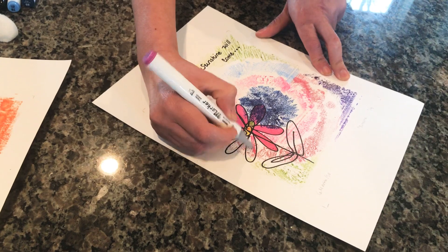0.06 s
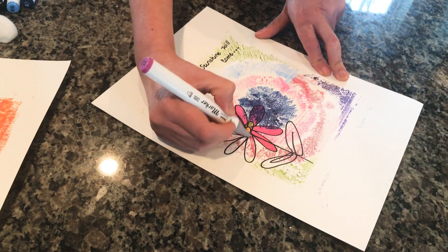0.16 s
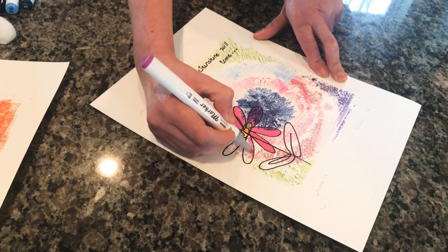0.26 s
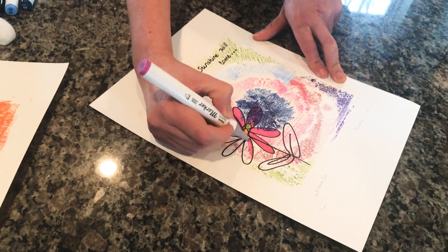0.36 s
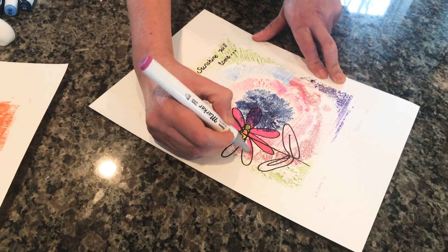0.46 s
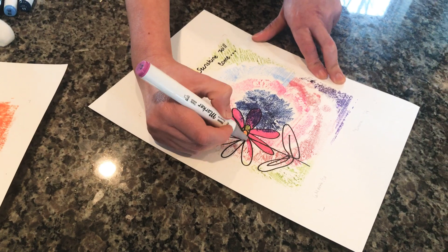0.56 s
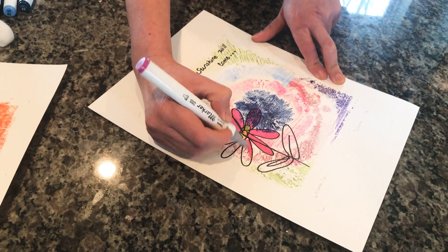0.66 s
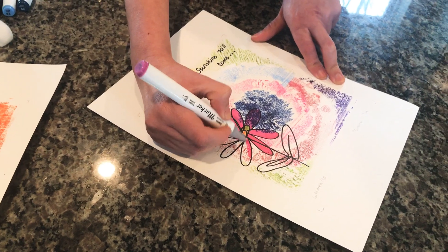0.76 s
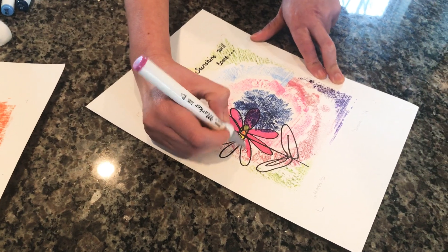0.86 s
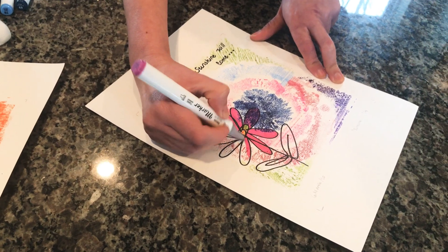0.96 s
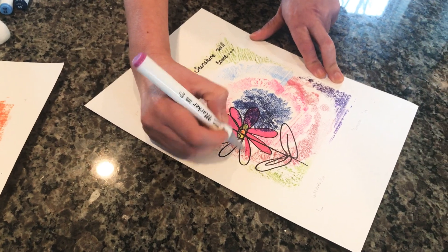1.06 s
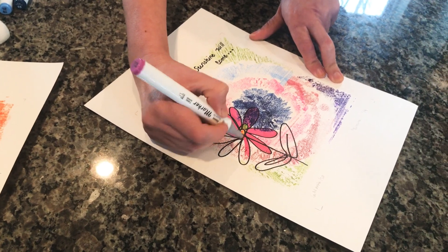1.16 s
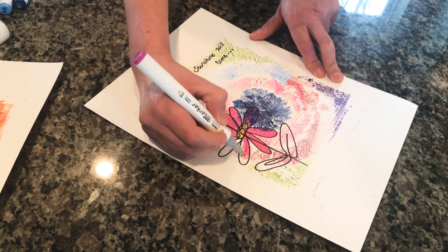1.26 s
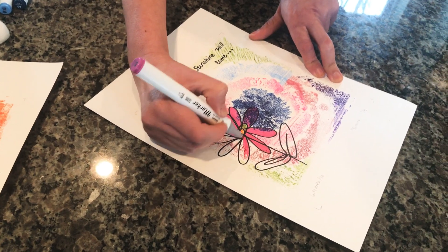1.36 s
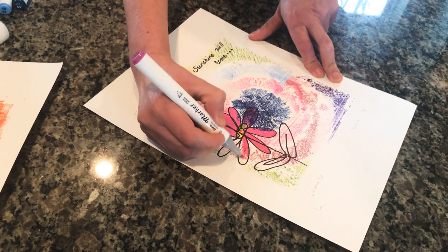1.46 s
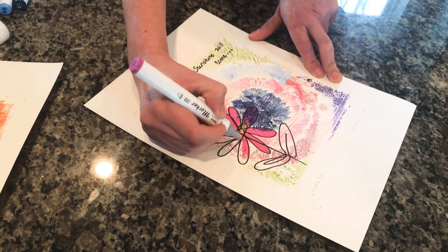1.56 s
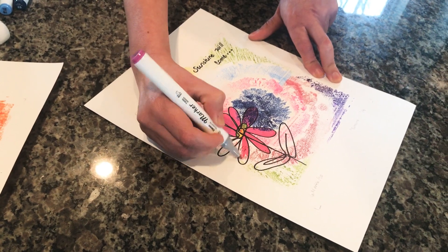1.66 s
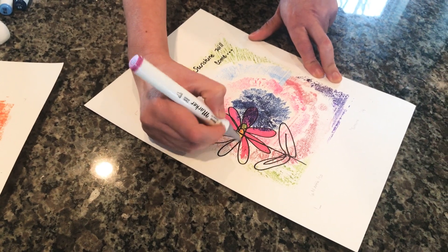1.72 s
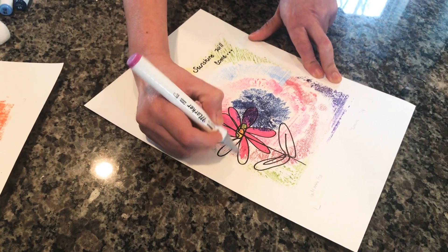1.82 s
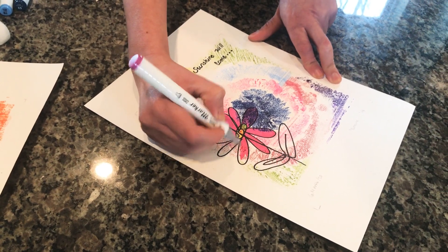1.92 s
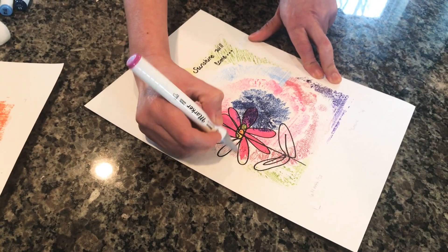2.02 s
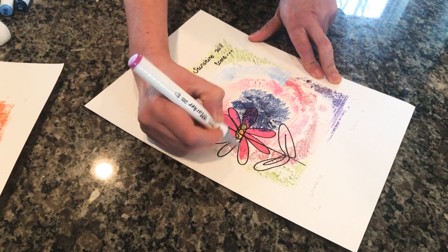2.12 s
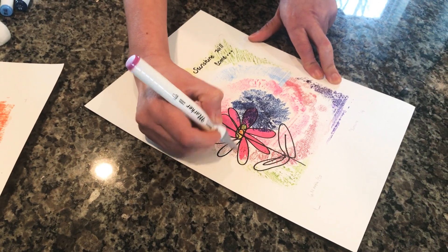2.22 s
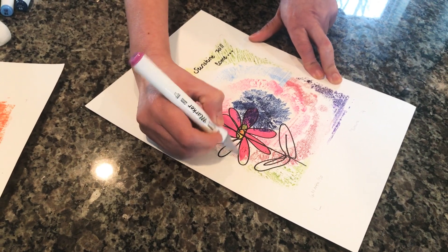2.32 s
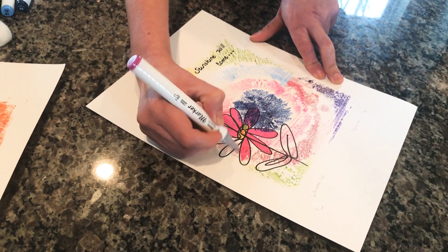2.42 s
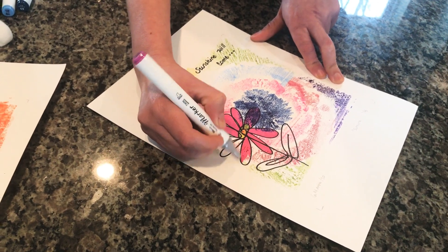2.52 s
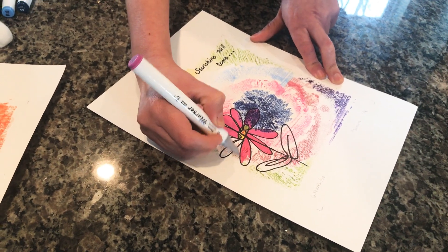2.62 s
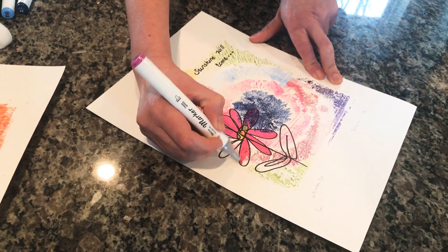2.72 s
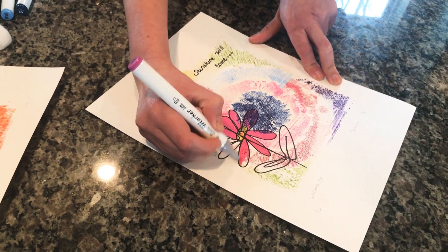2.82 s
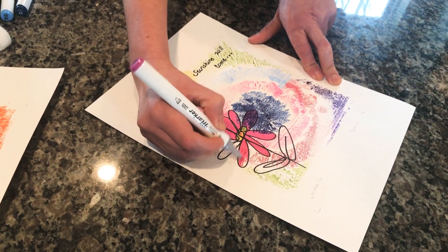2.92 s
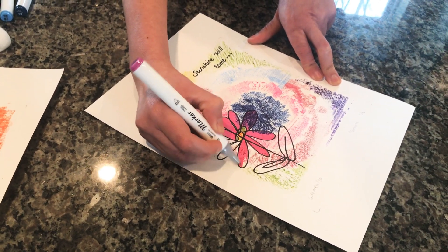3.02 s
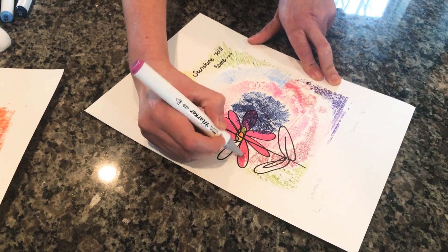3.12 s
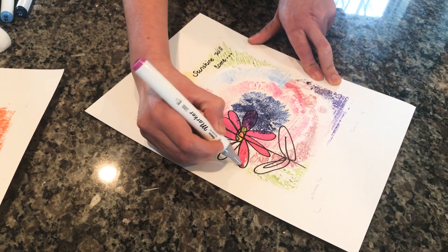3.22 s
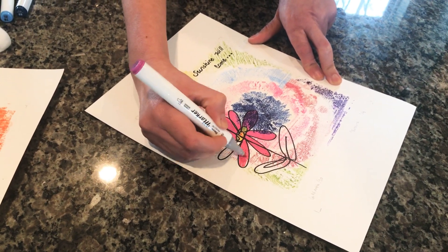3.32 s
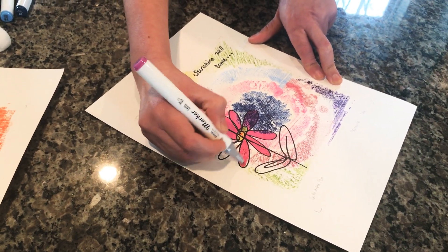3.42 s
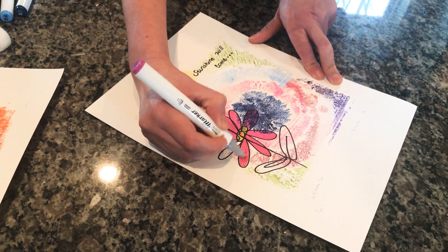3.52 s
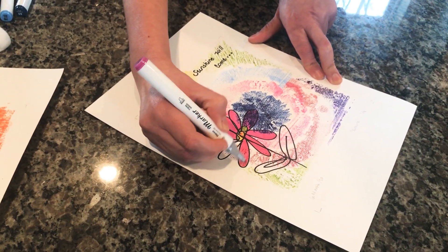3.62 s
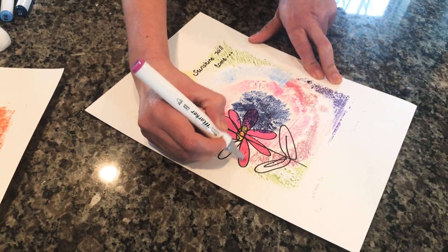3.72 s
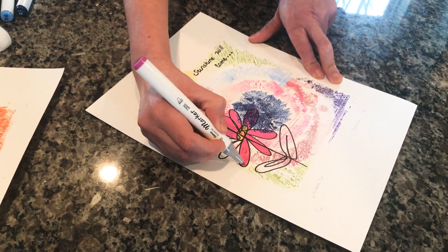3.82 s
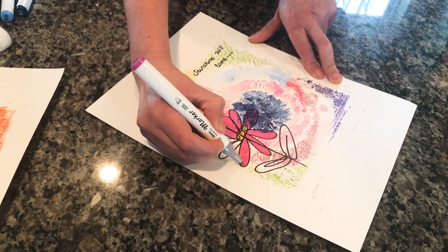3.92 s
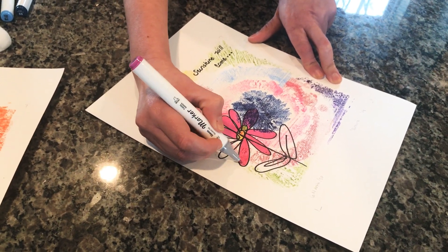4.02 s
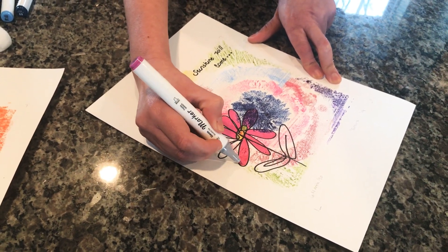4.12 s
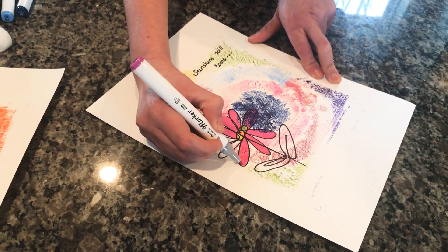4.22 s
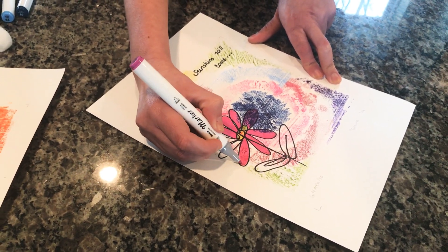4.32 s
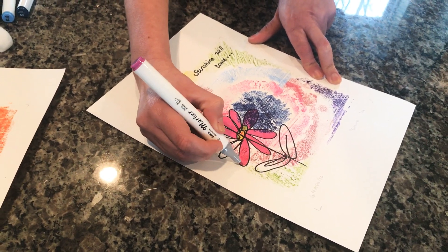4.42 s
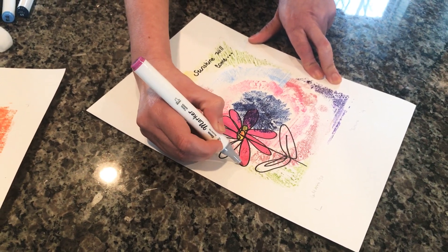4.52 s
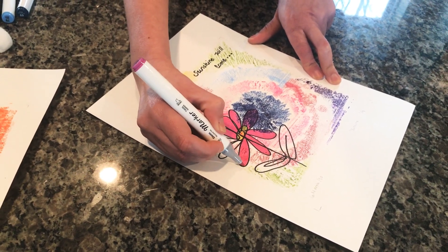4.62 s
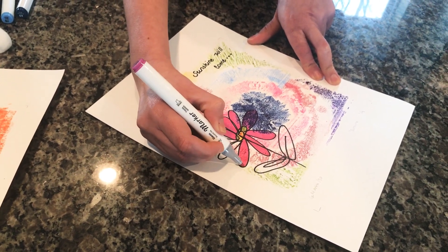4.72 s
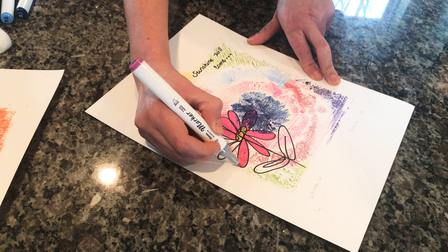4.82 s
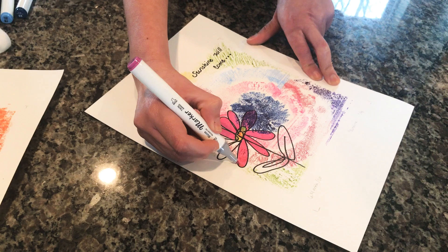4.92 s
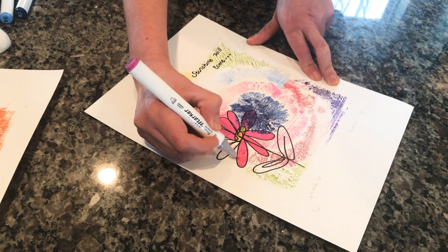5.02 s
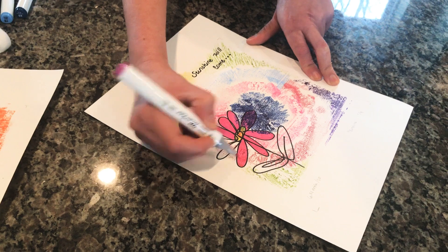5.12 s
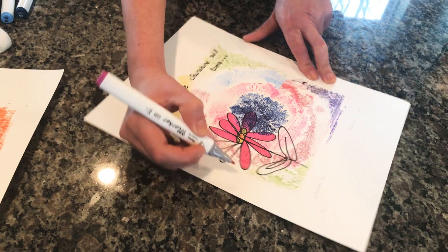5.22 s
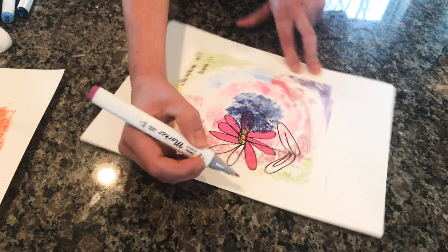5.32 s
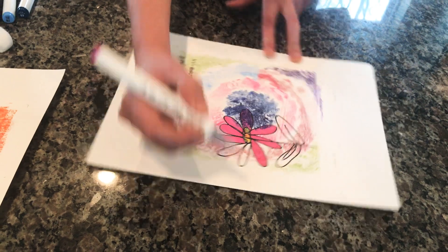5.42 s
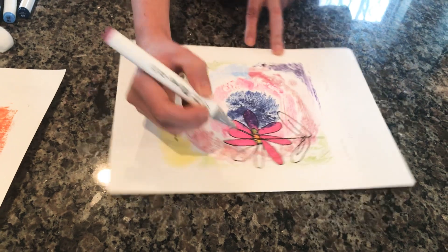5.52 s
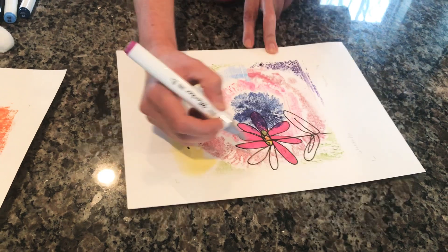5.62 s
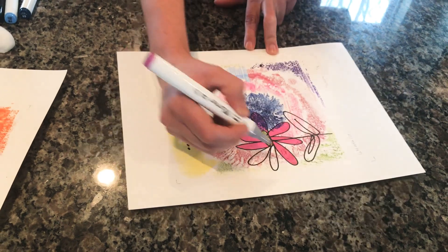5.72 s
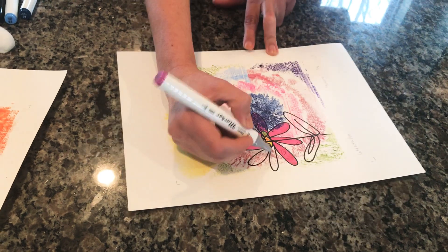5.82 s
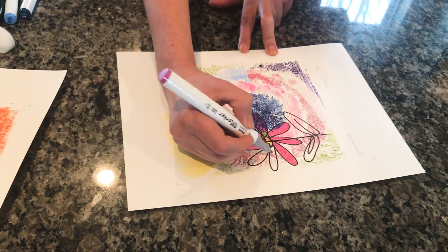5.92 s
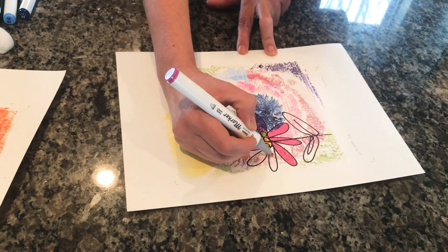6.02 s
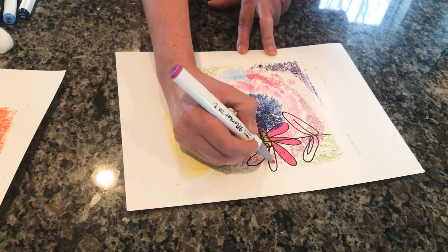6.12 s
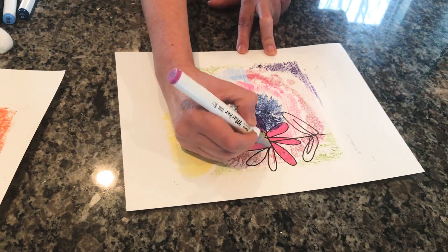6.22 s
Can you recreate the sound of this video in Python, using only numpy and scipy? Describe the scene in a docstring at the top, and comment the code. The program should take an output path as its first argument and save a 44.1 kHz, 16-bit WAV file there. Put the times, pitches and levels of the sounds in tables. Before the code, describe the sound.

A felt-tip marker colours on paper in quick, even back-and-forth strokes, bright and scratchy, for almost four seconds. It softens and gives way to a few faint dabs. The sheet then slides round on a stone counter with a short hiss and a thin squeak. The nib taps down sharply, a hand brushes the paper and one more stroke follows. The sound is close, in a quiet room with faint ventilation noise.

```python
"""On a stone counter in a quiet room, a felt-tip marker colours in a drawing on a sheet of paper.
The nib scrubs to and fro, about ten strokes a second; its friction snaps paper fibres, and these
impulses excite the resonances of nib and plastic barrel. A few light dabs follow. The sheet is slid
round, hissing and singing by stick and slip, the hand settles on it, and the nib taps down again.
Twice the arm bumps the counter. Ventilation noise, mains hum and a thin whine lie underneath."""
import sys
import numpy as np
from scipy import signal
from scipy.fft import rfft, irfft
from scipy.io import wavfile
from scipy.ndimage import uniform_filter1d

SR = 44100
rng = np.random.default_rng(int(sys.argv[2]) if len(sys.argv) > 2 else 0)


def unload_wav(signal):
    """Save mono or channel-first audio to the path in sys.argv[1] as 16-bit WAV at rate SR, clipped to [-1, 1]."""
    wavfile.write(
        sys.argv[1],
        SR,
        np.round(np.clip(np.atleast_2d(signal).T, -1, 1) * 32767).astype(np.int16),
    )


N = 276066
TIME = np.arange(N) / SR

# each to-and-fro of the nib: push_start_s, push_length_s, pull_start_s, push_extra_db
SCRUBS = [(-0.14, 0.09, -0.04, 5), (0.047, 0.097, 0.14, 12), (0.262, 0.096, 0.36, 10.5),
          (0.469, 0.087, 0.56, 11.5), (0.674, 0.079, 0.743, 7.5), (0.847, 0.099, 0.937, 11),
          (1.046, 0.108, 1.139, 10), (1.257, 0.12, 1.357, 9.5), (1.465, 0.107, 1.562, 10.5),
          (1.668, 0.107, 1.765, 10.5), (1.874, 0.111, 1.977, 10.5), (2.081, 0.111, 2.184, 10.5),
          (2.292, 0.117, 2.403, 12.5), (2.503, 0.113, 2.612, 12), (2.71, 0.088, 2.815, 9.5),
          (2.905, 0.094, 2.99, 4.5), (3.083, 0.081, 3.175, 8), (3.267, 0.09, 3.349, 8),
          (3.447, 0.079, 3.515, 9), (3.621, 0.102, 3.711, 7.5), (3.806, 0.089, 3.887, 9.5)]
# hand pressure, easing off until the nib lifts: time_s, relative_level_db, base_tilt_db_per_octave
PRESSURE = [(0, -49, -2), (0.6, -48.6, -2), (1.4, -46.5, -1.3), (2.4, -49.4, -3.3), (2.85, -52.2, -6.3),
            (3.2, -49.7, -7), (3.81, -54.3, -8.6), (3.9, -79, 3)]
# single touches of the nib: start_s, length_s, relative_level_db, base_tilt_db_per_octave
DABS = [(4.029, 0.044, -54.5, -11), (4.068, 0.074, -66.5, 2), (4.208, 0.043, -59, -10),
        (4.499, 0.061, -65.5, 0), (4.658, 0.046, -73, -2), (4.699, 0.083, -74, -10),
        (4.858, 0.062, -68.5, 5), (4.95, 0.092, -72.5, -6), (5.025, 0.096, -67, -20),
        (5.08, 0.11, -57, -17), (6.239, 0.084, -42.5, -4)]
# friction of felt on paper: frequency_hz, relative_density_db
FRICTION_SPECTRUM = [(400, -27), (700, -31.5), (1500, -14.5), (2250, -13.5), (2650, -3.5), (4000, -2.5),
                     (5400, -8.5), (8000, 0.5), (10500, 0), (12500, 2.3), (15800, 6.5)]
# resonances of nib and barrel: centre_hz, width_hz, lift_db
MARKER_MODES = [(3080, 580, 6.3), (4620, 480, 8.3), (6115, 1590, 15.5), (7160, 780, 13.8), (8820, 1520, 13)]
# whisper of the felt itself: frequency_hz, relative_density_db
FELT_SPECTRUM = [(600, -19), (1200, -16), (2000, -10.5), (3300, -2), (4400, 1), (5400, -1.5), (7500, -17),
                 (10000, -6.5), (15800, -4)]
# ventilation noise: frequency_hz, relative_density_db
AIR_SPECTRUM = [(20, -30.5), (27, -15), (35, -10.5), (52, 4), (90, -0.5), (160, -4.5), (350, -6),
                (500, -13.5), (900, -16), (2000, -21), (4000, -22.5), (8000, -25.5), (15800, -24)]
# tones of mains and electronics: pitch_hz, level_db, waver_hz
ELECTRIC_TONES = [(120, -80, 0), (10720, -89, 28)]
# bumps of the arm on the counter: centre_s, length_s, level_db
ARM_BUMPS = [(2.935, 0.056, -66.5), (5.597, 0.19, -67.5)]
# the sheet sliding over the stone: time_s, level_db
SLIDE_LEVELS = [(5.2, -76), (5.28, -69.5), (5.31, -60), (5.385, -60.5), (5.42, -54), (5.46, -61),
                (5.53, -61), (5.6, -64.5), (5.68, -72.5), (5.76, -100)]
# hiss of the sliding sheet: frequency_hz, relative_density_db
SLIDE_SPECTRUM = [(500, -29), (1100, -8), (2200, -7.5), (2850, 4), (3800, -0.5), (6500, 1.5), (9000, 0),
                  (12000, 2.5), (15800, 4)]
# the sheet singing, hoarsely at first: time_s, pitch_hz, level_db, pure_share
SQUEAL = [(5.23, 2780, -88, 0), (5.3, 2850, -76, 0), (5.37, 2980, -76, .1), (5.42, 3280, -73, .5),
          (5.5, 3230, -71, .75), (5.6, 3230, -75.5, .8), (5.68, 3220, -82, .7), (5.73, 3220, -92, .7)]
# taps of the nib and ticks of the sheet: start_s, relative_level_db
TAPS = [(5.3, -60), (5.907, -56), (5.9105, -41.5), (5.921, -58), (6.203, -53), (6.208, -50)]
# colour of a tap: frequency_hz, relative_density_db
TAP_SPECTRUM = [(300, 4), (1200, -5.5), (2200, 2), (3500, 6.5), (4600, 7.5), (6300, 8.5), (7300, -7),
                (8500, 2), (13000, -1), (15800, -6)]
# the side of the hand settling on the paper: time_s, level_db
HAND_LEVELS = [(5.88, -97), (5.93, -71), (6.02, -77), (6.08, -66.5), (6.13, -71.5), (6.19, -77),
               (6.26, -67.5)]
# brush of skin on paper: frequency_hz, relative_density_db
SKIN_SPECTRUM = [(400, 3), (1200, -5), (2100, -3), (3000, -0.5), (4200, -2), (7000, -6), (10000, -14),
                 (15800, -19)]
# resonance of the sheet under the hand: centre_hz, width_hz, lift_db
SHEET_MODES = [(2050, 400, 5)]


def from_db(db):
    """Amplitude grows tenfold with every 20 decibels."""
    return 10 ** (np.asarray(db) / 20)


def rms_one(x):
    """Normalisation to unit mean power."""
    return x / np.sqrt(np.mean(x ** 2) + 1e-20)


def level_curve(rows):
    """An amplitude envelope through rows of time_s, level_db, silent outside them."""
    s, db = np.transpose(rows)
    return from_db(np.interp(TIME, s, db)) * (TIME > s[0]) * (TIME < s[-1])


def drift(rate_hz):
    """Low-passed noise is a random wander, here of unit rms."""
    lowpass = signal.butter(2, rate_hz, fs=SR, output="sos")
    return rms_one(signal.sosfilt(lowpass, rng.standard_normal(N + SR))[SR:])


def response(spectrum, resonances=(), size=2048):
    """A minimum-phase impulse response of unit energy: resonant peaks on a smooth spectrum."""
    hz = np.maximum(np.arange(size // 2 + 1) * SR / size, 1)
    point_hz, point_db = np.transpose(spectrum)
    db = np.interp(np.log(hz), np.log(point_hz), point_db)
    for centre, width, lift in resonances:
        db += lift * .5 ** ((2 * (hz - centre) / width) ** 2)
    cepstrum = irfft(np.log(from_db(db)))
    cepstrum[1:size // 2] *= 2  # folded forward: nothing rings before its cause
    cepstrum[size // 2 + 1:] = 0
    impulse = irfft(np.exp(rfft(cepstrum)))
    return impulse / np.sqrt(np.sum(impulse ** 2))


def through(x, impulse):
    """A linear system convolves its input with its impulse response."""
    return signal.fftconvolve(x, impulse)[:N]


def tilted(x, db_per_octave, pivot_hz=6800):
    """A time-varying spectral tilt, from half an octave below the pivot to one octave above."""
    octaves = np.log2(np.maximum(np.fft.rfftfreq(N, 1 / SR), 1) / pivot_hz)
    centres = np.array([-.5, 0, .5, 1])
    spectrum = rfft(x)
    bands = [irfft(spectrum * np.interp(octaves, centres, share), N) for share in np.eye(len(centres))]
    return sum(band * from_db(db_per_octave * octave) for band, octave in zip(bands, centres))


def ease(share):
    """As in harmonic motion, speed follows a quarter sine from rest to its peak."""
    return np.sin(np.pi / 2 * np.clip(share, 0, 1))


def strokes(rest_s=0.013, flick_s=0.035):
    """Reciprocating motion, then dabs: start_s, length_s, rise_share, fall_share, db, swell_db, tilt."""
    s, level, tilt = np.transpose(PRESSURE)
    pushes = [row[0] for row in SCRUBS]
    next_pushes = pushes[1:] + [pushes[-1] + np.median(np.diff(pushes))]
    for (push, length, pull, extra_db), next_push in zip(SCRUBS, next_pushes):
        # a push is brighter, bites at once and tapers into the turn
        push_db = np.interp(push, s, level) + extra_db
        yield push, length, .235, .51, push_db, -9.6, np.interp(push, s, tilt) + 2
        # a pull gathers weight, stops short and rests
        pull_length = next_push - rest_s - pull
        yield pull, pull_length, .28, .47, np.interp(pull, s, level), 8.2, np.interp(pull, s, tilt)
    for start, length, db, brightness in DABS:
        rise = np.clip(0.6 * (1 - flick_s / length), .05, .95)  # the shortest dabs strike at once
        yield start, length, rise, 1 - rise, db, 0, brightness


def nib_motion(steepness=1.6, speed_tilt_db=8.0, creep_db=-66.5, trim_db=-0.4, bite_s=0.01):
    """Friction noise grows louder and brighter with sliding speed, which rises and falls each stroke."""
    force, tilt, speed, bite = np.zeros((4, N))
    for start, length, rise, fall, db, swell_db, brightness in strokes():
        on = (TIME > start) & (TIME < start + length)
        travel = (TIME[on] - start) / length
        pace = ease(travel / rise) * ease((1 - travel) / fall)
        drag = from_db(db + trim_db + swell_db * travel) * pace ** steepness
        speed[on] = np.maximum(speed[on], pace)
        force[on] = np.hypot(force[on], drag)
        bite[on] += drag * np.exp(-(TIME[on] - start) / bite_s)
        tilt[on] = brightness
    tilt += speed_tilt_db * (speed - .85)
    last_pull = SCRUBS[-1][2]
    force += from_db(creep_db) * (TIME < last_pull)  # the nib creeps on through each turn
    return force, uniform_filter1d(tilt, size=256), speed, bite


def fibres(per_s, spread_db, hiss_db):
    """Shot noise of unit rms: paper fibres snap free at random, a few of them hard, over a fine hiss."""
    sizes = from_db(spread_db * np.minimum(rng.exponential(1, N), 4.5))
    snaps = (rng.random(N) < per_s / SR) * sizes * rng.choice([-1, 1], N)
    return rms_one(rms_one(snaps) + from_db(hiss_db) * rng.standard_normal(N))


def marker(grip_db=1.52, roll_db=2.0, felt_db=-38, bite_db=-7):
    """Forced vibration: felt dragging over paper fibres drives the resonances of nib and barrel."""
    force, tilt, speed, bite = nib_motion()
    grip = from_db(grip_db * drift(rate_hz=120))  # the tooth of the paper is uneven
    snaps = fibres(per_s=2500 + 6000 * speed, spread_db=3.2, hiss_db=3)
    scrape = tilted(snaps * force * grip, tilt)
    # the felt whispers even under a touch too light to ring the barrel, and rasps as it first digs in
    felt = from_db(felt_db) * np.sqrt(force) + from_db(bite_db) * bite
    out = through(rng.standard_normal(N) * felt * grip, response(FELT_SPECTRUM))
    # as the nib rolls in the fingers, neighbouring resonances trade strength
    roll = np.tanh(drift(rate_hz=21))
    for side in (1, -1):
        modes = [(hz, width, lift + side * roll_db * (-1) ** k)
                 for k, (hz, width, lift) in enumerate(MARKER_MODES)]
        out += through(scrape * (1 + side * roll) / 2, response(FRICTION_SPECTRUM, modes))
    return out


def background(air_db=-69.5):
    """The noise floor: broadband ventilation, mains hum and a frequency-modulated electronic whine."""
    out = from_db(air_db) * through(rng.standard_normal(N), response(AIR_SPECTRUM, size=16384))
    for hz, db, waver_hz in ELECTRIC_TONES:
        phase = 2 * np.pi * np.cumsum(hz + waver_hz * drift(rate_hz=4.4)) / SR
        out += from_db(db) * np.sqrt(2) * np.sin(phase)
    return out


def arm_bumps(band_hz=(55, 300)):
    """Structure-borne sound: the arm shifts its weight and the counter rumbles briefly."""
    bandpass = signal.butter(2, band_hz, "band", fs=SR, output="sos")
    weight = sum(from_db(db) * np.exp(-(2 * (TIME - s) / length) ** 2) for s, length, db in ARM_BUMPS)
    return weight * rms_one(signal.sosfilt(bandpass, rng.standard_normal(N)))


def sheet_slide(rub):
    """Sliding friction of paper on polished stone gives a broadband hiss."""
    return through(rub * level_curve(SLIDE_LEVELS), response(SLIDE_SPECTRUM))


def sheet_squeal(pure_drift_hz=45, hoarse_drift_hz=190):
    """Unsteady stick and slip spreads the sheet's pitch into a narrow and a wide band of noise."""
    s, hz, db, pure_share = np.transpose(SQUEAL)
    phase = 2 * np.pi * np.cumsum(np.interp(TIME, s, hz)) / SR
    purity = np.interp(TIME, s, pure_share)
    squeal = np.zeros(N)
    for share, rate_hz in ((purity, pure_drift_hz), (1 - purity, hoarse_drift_hz)):
        band = drift(rate_hz) * np.sin(phase) + drift(rate_hz) * np.cos(phase)
        squeal += np.sqrt(share) * band
    return squeal * level_curve(np.column_stack([s, db]))


def taps(slap_decay_s=0.0045, crack_db=11):
    """Impact: a sharp impulse, then the exponentially decaying slap of paper on stone."""
    force = np.zeros(N)
    for start_s, db in TAPS:
        at = int(start_s * SR)
        slap = .5 * rng.standard_normal(N - at) * np.exp(-TIME[:N - at] / slap_decay_s)
        slap[0] = from_db(crack_db)
        force[at:] += from_db(db) * slap
    return through(force, response(TAP_SPECTRUM))


def hand_brush(rub):
    """Soft friction of skin on paper excites a resonance of the sheet."""
    return through(rub * level_curve(HAND_LEVELS), response(SKIN_SPECTRUM, SHEET_MODES))


def room(x, early_db=-14, early_decay_s=0.0034, tail_db=-20, t60_s=0.32):
    """Early reflections off hand and counter precede a faint reverberation from the walls."""
    t = TIME[:SR // 2]
    early = rng.standard_normal(len(t)) * np.exp(-t / early_decay_s) * (t > .001)
    tail = rng.standard_normal(len(t)) * from_db(-60 * t / t60_s) * (t > .008)
    echoes = from_db(early_db) * early / np.linalg.norm(early)
    echoes += from_db(tail_db) * tail / np.linalg.norm(tail)
    return (x + through(x, echoes)) / np.sqrt(1 + np.sum(echoes ** 2))


def scene():
    """Superposition: all sources add at one point just above the counter."""
    colouring = marker()
    rub = fibres(per_s=6000, spread_db=2.5, hiss_db=0)
    on_paper = colouring + sheet_slide(rub) + sheet_squeal() + taps() + hand_brush(rub)
    return (room(on_paper) + arm_bumps() + background())[None]


def record(dry, cutoff_hz=15740):
    """Band limiting: an elliptic low-pass cuts the highest treble steeply."""
    return signal.sosfilt(signal.ellip(12, .1, 70, cutoff_hz, fs=SR, output="sos"), dry)


dry = scene()
out = record(dry)
unload_wav(out)
```